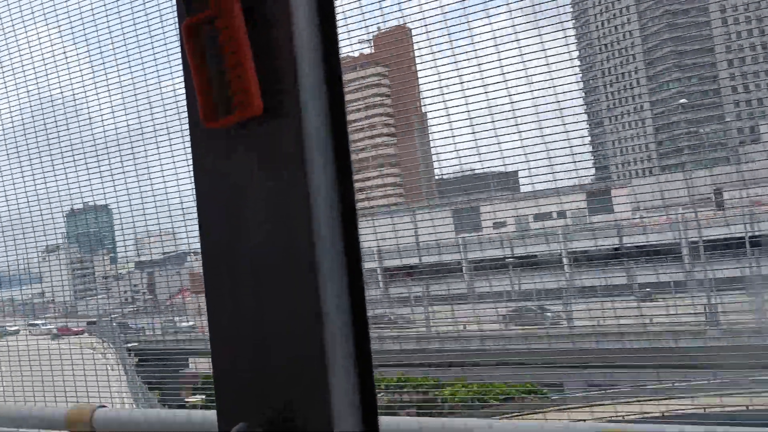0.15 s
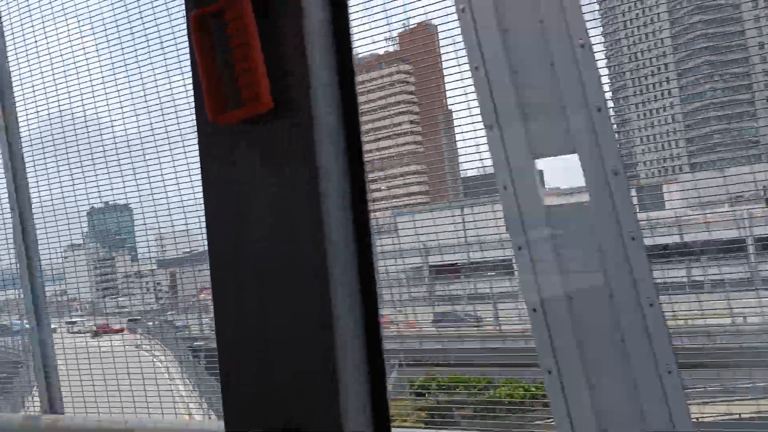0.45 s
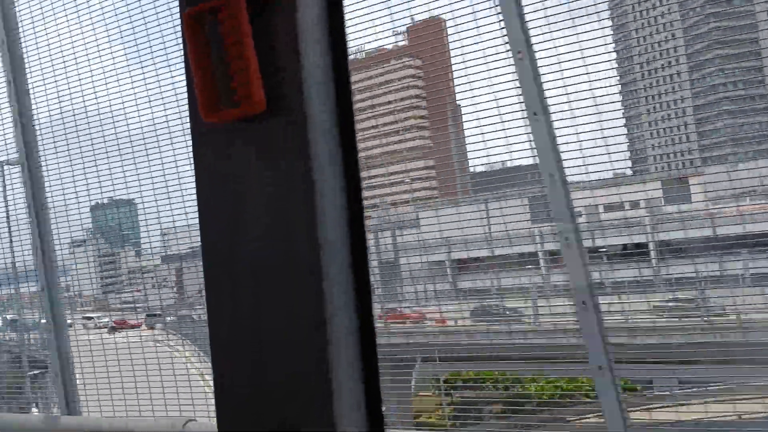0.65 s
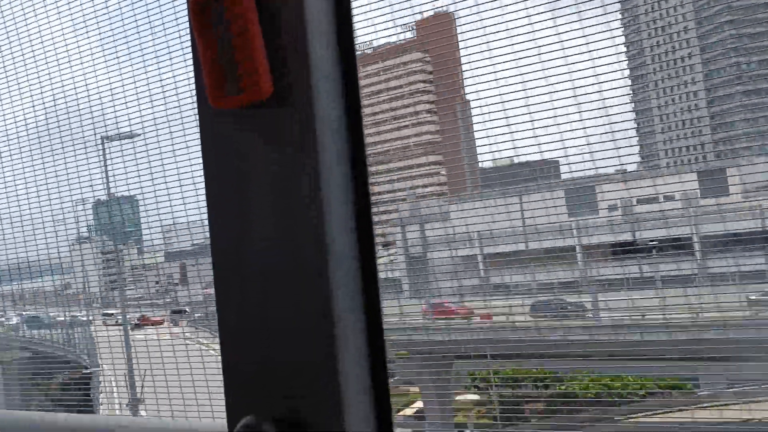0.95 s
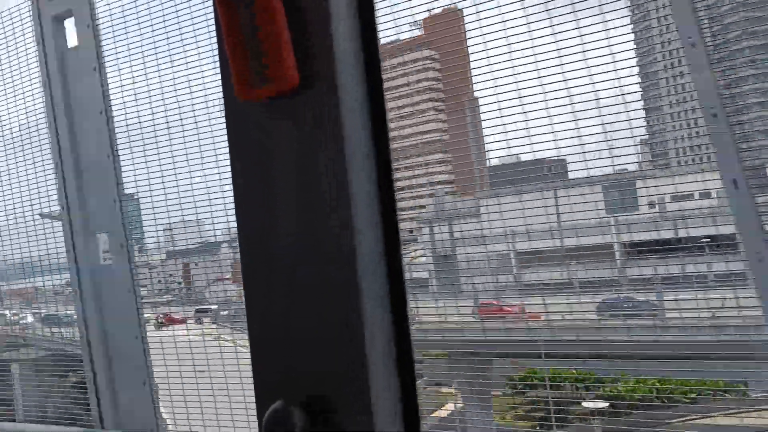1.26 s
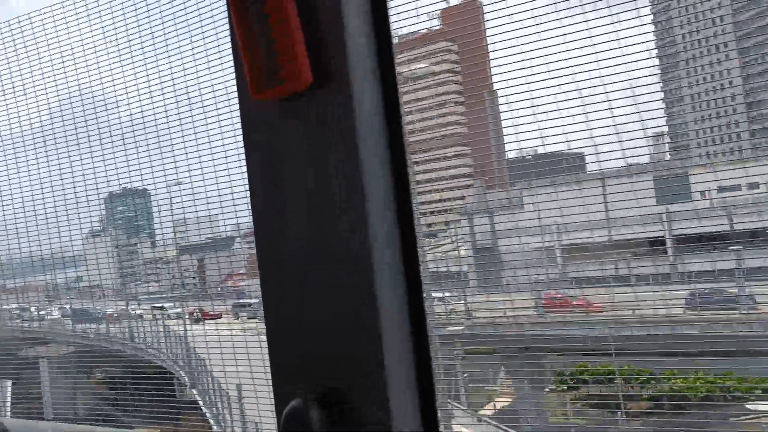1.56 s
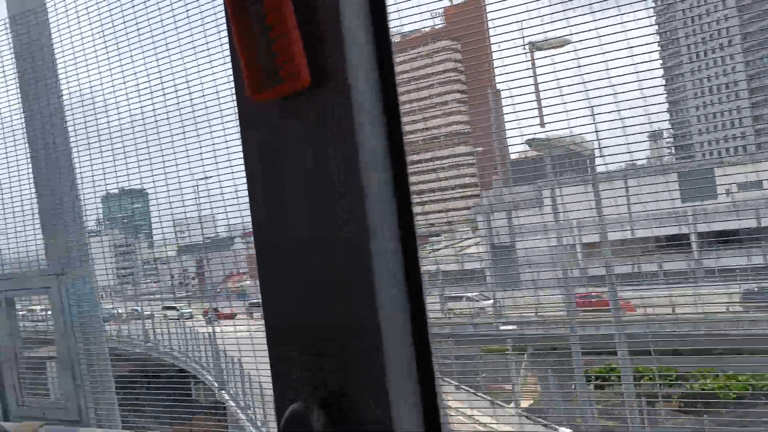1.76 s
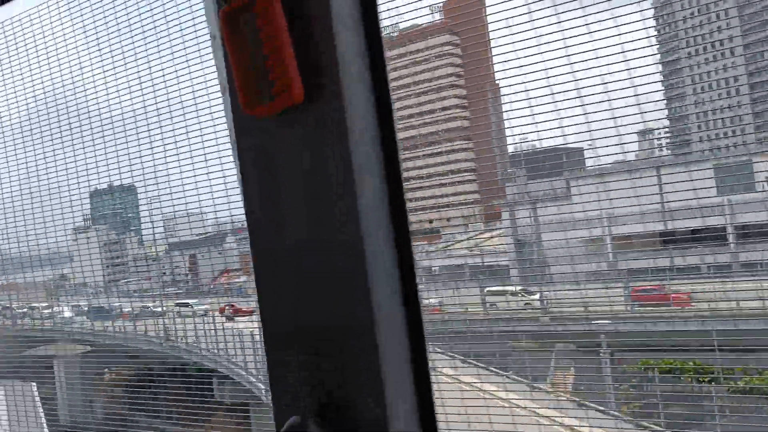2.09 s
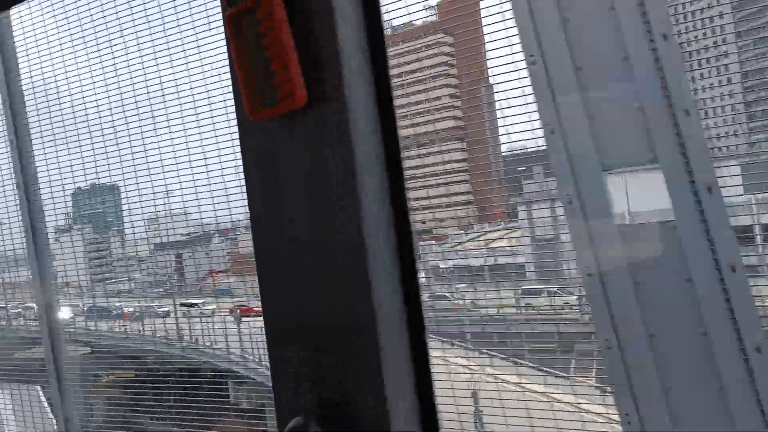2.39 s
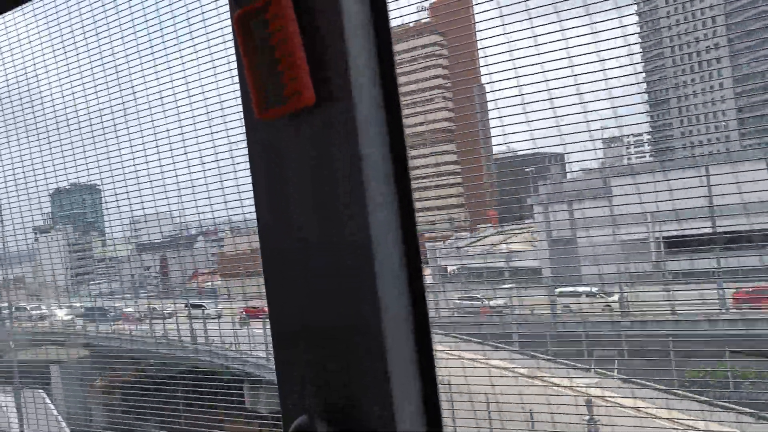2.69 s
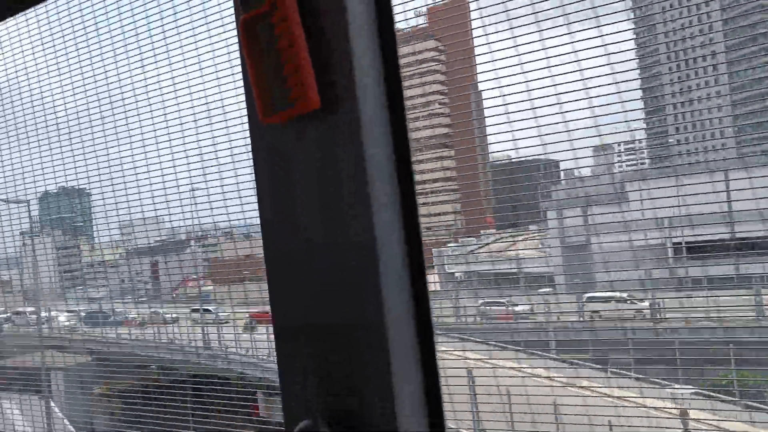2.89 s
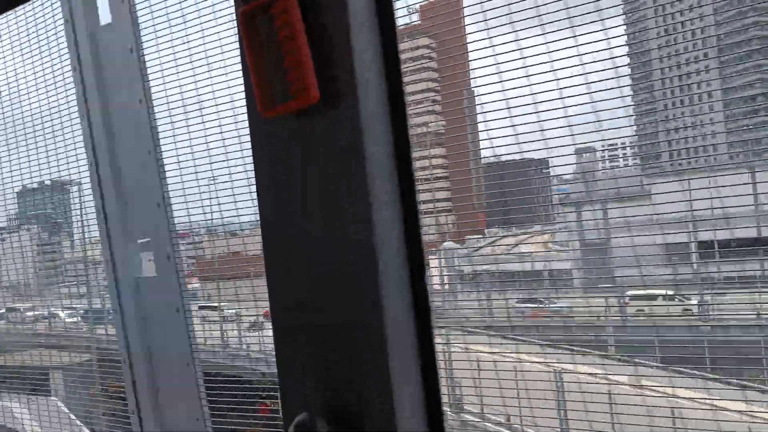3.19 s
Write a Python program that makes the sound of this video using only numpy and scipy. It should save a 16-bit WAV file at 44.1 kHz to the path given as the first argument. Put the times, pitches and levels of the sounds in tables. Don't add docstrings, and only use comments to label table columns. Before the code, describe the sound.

Diesel bus interior: low engine hum drops in pitch over tyre rumble, with light rattles and ticks

```python
import sys
import numpy as np
from scipy import signal
from scipy.fft import rfft, irfft, next_fast_len
from scipy.io import wavfile
from scipy.ndimage import uniform_filter1d, map_coordinates

SR = 44100
rng = np.random.default_rng(int(sys.argv[2]) if len(sys.argv) > 2 else 0)


def voltage_ratio(decibels):
    exponent = np.asarray(decibels, float) / 20
    return 10 ** exponent


def store_wav(level_fs):
    pcm = np.round(np.clip(np.atleast_2d(level_fs), -1, 1) * 32767)
    wavfile.write(sys.argv[1], SR, pcm.T.astype(np.int16))


N = 147294
SIDES = np.array([[1], [-1]])


def unit(x):
    return x / np.sqrt(np.mean(x ** 2) + 1e-20)


def along(points, hz):
    point_hz, value = np.transpose(points)
    return np.interp(np.log(hz + 1), np.log(point_hz + 1), value)


def curves(rows):
    s, *columns = np.transpose(rows)
    return [np.interp(np.arange(N) / SR, s, column) for column in columns]


def wobble(rate):
    knots = rng.standard_normal(400)
    return map_coordinates(knots, [np.arange(N) * rate / SR])


def filtered(x, response):
    size = next_fast_len(N + SR // 2)
    hz = np.fft.rfftfreq(size, 1 / SR)
    return irfft(rfft(x, size) * response(hz), size)[..., :N]


def modes(table):
    def response(hz):
        total = 0
        for k, (centre, width, db) in enumerate(table):
            band = 1j * hz * width
            total = total + (-1) ** k * voltage_ratio(db) * band / (centre * centre - hz * hz + band)
        return total
    return response


def peaks(table, hz):
    return voltage_ratio(sum(db / (1 + (2 * (hz - centre) / width) ** 2) for centre, width, db in table))


# pitch_hz, correlation
ALIKE = [(40, .99), (100, .97), (250, .95), (500, .75), (1200, .5), (2200, .1), (5000, .13), (15000, .1)]
# pitch_hz, left_leads_radians
LEADS = [(100, 0.5), (500, -0.74), (950, -0.96), (1250, -1.5), (2150, -5), (3000, -8.5)]
# pitch_hz, left_minus_right_db
LEAN = [(60, 1), (200, -1), (700, -0.5), (1400, -6.5), (3300, -5), (6000, -12.5), (9000, 3), (14000, -5)]


def stereo(pair):
    def mid_side(hz):
        angle = np.arccos(np.clip(along(ALIKE, hz), 0, 1)) / 2
        return np.array([np.cos(angle), np.sin(angle)])

    def placing(hz):
        return voltage_ratio(SIDES * along(LEAN, hz) / 2) * np.exp(.5j * SIDES * along(LEADS, hz))

    mid, side = filtered(pair, mid_side)
    return filtered(mid + SIDES * side, placing)


def rush(spectrum, patchy_db, ring=lambda hz: 1):
    z = signal.stft(rng.standard_normal((2, N)), nperseg=512)[2]
    patches = uniform_filter1d(rng.standard_normal(z.shape[1:]), size=6, axis=0)
    patches = unit(uniform_filter1d(patches, size=10, axis=1))
    pair = signal.istft(z * voltage_ratio(patchy_db * patches), nperseg=512)[1][:, :N]
    return unit(stereo(filtered(pair, lambda hz: voltage_ratio(along(spectrum, hz)) * ring(hz))))


# start_s, firing_hz, load_db, uneven_db (lifts the side orders between gears)
ENGINE = [(0, 96.5, -20, 0), (.1, 96.5, -16.5, -2), (.24, 96.5, -18, -1), (.33, 96, -24, 4),
          (.45, 92, -25, 7), (.6, 88, -25, 8), (.8, 79, -25, 8), (.88, 73, -22, 3), (.97, 68, -21, -1),
          (1.45, 68.2, -22, -1), (1.6, 68.8, -20, -2), (1.9, 68, -24, -1), (2.3, 68, -23.5, -3),
          (2.6, 69, -23.5, -4), (2.85, 70, -24, -2), (3, 70.5, -27, 3), (3.34, 72.5, -23.5, 2)]
# pitch_hz, level_db
CABIN = [(45, -16), (69, 0), (85, -8), (98, 0), (140, -2), (195, -3), (240, -12), (290, 0)]
ORDERS_DB = [-12, -14, -9, 0, -15, -14, -5, -5, -12, -7, -15, -12, -14, -14, -14, -6, -16, -16, -14, -16,
             -16, -12]


def engine():
    firing_hz, load_db, uneven_db = curves(ENGINE)
    cycle_hz = firing_hz * (1 + .002 * wobble(6)) / 6
    phase = 2 * np.pi * np.cumsum(cycle_hz) / SR
    out = np.zeros((2, N))
    for k, order_db in enumerate(ORDERS_DB, start=3):
        drift_db = 1 if k % 6 else .8
        start, lag = rng.standard_normal(2)
        level_db = order_db + uneven_db * (6 < k < 16) + drift_db * wobble(7)
        level_db = level_db + along(CABIN, firing_hz * k / 6)
        turn = SIDES * 0.013 * k * (lag - 1)
        out += voltage_ratio(level_db) * np.sin(k * phase + 2 * start + turn)
    return np.sqrt(2) * voltage_ratio(load_db) * out * voltage_ratio(-.5 * SIDES)


# start_s, roar_db, hiss_db
ROAD = [(0, -18.5, -35), (.45, -20.5, -34.5), (.88, -20, -36), (.95, -22, -36), (1.6, -21, -34.5),
        (1.8, -23, -37.5), (2.1, -22, -38), (2.45, -24, -36), (2.9, -19.5, -35), (3.34, -18.5, -34)]
# pitch_hz, level_db (per Hz)
ROAR = [(13, -61), (22, -9.5), (64, -7), (100, -3), (193, -11.5), (233, -9.5), (299, -9.5), (441, -9.5),
        (900, -25), (1170, -31), (1980, -120)]
HISS = [(410, -31), (700, 3), (985, -4.5), (1140, -1.5), (1470, -5.5), (1820, -5.5), (3270, -18.5),
        (6100, -29), (7200, -32), (9360, -61.5), (15800, -120)]
AIR = [(5000, -32), (7200, -24), (8200, -9.5), (9500, -15.5), (12400, -13.5), (13200, -13), (15900, -10),
       (16500, -10.5)]
# pitch_hz, width_hz, level_db
PANELS = [(121, 210, 5), (190.8, 87, 2), (302.6, 20, 6), (376, 9.5, 5.5), (519, 51, 5), (633.5, 66, 7.5),
          (850, 49, 7.5), (917.4, 25, 13.5)]


def road():
    roar_db, hiss_db = curves(ROAD)
    roar_noise = rush(ROAR, patchy_db=.3, ring=lambda hz: peaks(PANELS, hz))
    roar = voltage_ratio(roar_db - 2 + 0.31 * wobble(7.4)) * roar_noise

    shake_db = 0.51 * wobble(8.5) + 0.82 * wobble(36)
    clatter_db = 0.06 * np.sin(np.pi * np.cumsum(curves(ENGINE)[0]) / SR)
    port = [(6490, 1200, 5.5)]
    hiss_noise = rush(HISS, patchy_db=.3, ring=lambda hz: peaks(port, hz))
    hiss = voltage_ratio(hiss_db + 1 + shake_db + clatter_db) * hiss_noise

    air_db = -63 + .6 * (hiss_db - hiss_db.mean()) + 1.3 * shake_db
    return roar + hiss + voltage_ratio(air_db) * rush(AIR, patchy_db=1.2)


WHINE_HZ = [1108, 1618, 1782, 1576]
# width_hz, left_minus_right_db, left_leads_radians, makeup_db
WHINES = [(16, -7, -2.5, 8), (6, -7, -2.6, 6), (14, -6, 1.2, 3), (12, -6, -2.5, 6)]
# start_s, level_db, level_db, level_db, level_db
GEARS = [(0, -48, -58, -54, -64), (.08, -43, -57, -52, -62), (.28, -43, -54, -52, -56),
         (.36, -54, -54, -58, -53), (.5, -58, -56, -54, -62), (.58, -56, -56, -45, -64),
         (.65, -54, -55, -55, -64), (.9, -60, -54, -56, -64), (1.2, -60, -55, -60, -64),
         (1.5, -60, -56, -56, -64), (2, -62, -57, -62, -64), (2.6, -58, -56, -60, -60),
         (2.85, -55, -55, -55, -59), (3.02, -55, -55, -51, -59), (3.1, -56, -54, -57, -58),
         (3.22, -56, -54, -51, -60), (3.34, -56, -58, -52, -62)]


def gear_whines():
    t, half = np.arange(N) / SR, SIDES / 2
    out = np.zeros((2, N))
    for hz, mesh_db, (width, lean_db, lead, makeup_db) in zip(WHINE_HZ, curves(GEARS), WHINES):
        level_db = mesh_db + makeup_db + 1.2 * wobble(width) + half * lean_db
        out += voltage_ratio(level_db) * np.sin(2 * np.pi * hz * t + .7 * wobble(width) + half * lead)
    return np.sqrt(2) * out


# start_s, pitch_hz, level_db
TURBO = [(0, 13130, -86), (.4, 13200, -83), (.75, 12950, -83), (1.0, 12550, -87), (1.2, 12250, -81),
         (1.7, 11520, -83), (2.05, 11100, -79), (2.4, 10975, -78), (3.1, 10975, -77), (3.34, 11030, -84)]


def turbo():
    turbo_hz, turbo_db = curves(TURBO)
    spin = 2 * np.pi * np.cumsum(turbo_hz + 18 * wobble(40)) / SR
    flicker_db = 6 * np.array([wobble(30), wobble(30)])
    level_db = turbo_db + flicker_db + 2.5 * SIDES
    return np.sqrt(2) * voltage_ratio(level_db) * np.sin(spin - .6 * SIDES)


# pitch_hz, width_hz, level_db, left_minus_right_db
HUMS = [(295, 20, -32, -2.5), (194, 12, -27, -1.5), (432, 12, -39, 0), (532, 20, -38, 1),
        (630, 24, -39, -2)]
# start_s, level_db
SHAKE = [(0, 0), (.3, 0), (.45, 3), (.6, 1), (.88, 1), (.97, -5), (1.4, -5), (1.7, -5), (2, -8), (2.6, -8),
         (3, -5), (3.34, -4)]


def hums():
    t, half = np.arange(N) / SR, SIDES / 2
    out = np.zeros((2, N))
    for hz, width, db, lean_db in HUMS:
        level_db = db + 2.3 * wobble(width) + half * lean_db
        out += voltage_ratio(level_db) * np.sin(2 * np.pi * hz * t + 1.38 * wobble(width) - half * hz / 900)
    return np.sqrt(2) * voltage_ratio(curves(SHAKE)[0]) * out


def burst(s, db, length, lean_db):
    rise_s, fade_s = .007, .012
    t = np.arange(N) / SR - s
    fade = np.exp(-np.maximum(t - length / 2, 0) / fade_s * 0.016 / length)
    return voltage_ratio(db + SIDES * lean_db / 2) * np.clip(t / rise_s, 0, 1) * fade


def knocks():
    per_s = 6000
    hits = rng.random((2, N)) < per_s / SR
    return stereo(unit(hits * rng.standard_normal((2, N))))


# start_s, level_db, length_s, left_minus_right_db
TRIM = [
    (0.344, -43.5, 0.019, -6),
    (0.607, -50.5, 0.036, -2),
    (0.756, -43.5, 0.026, -2),
    (0.94, -44, 0.029, -1),
    (1.145, -52, 0.03, 2),
    (1.393, -55, 0.041, -11),
    (2.025, -54, 0.054, -5),
]
# pitch_hz, width_hz, level_db
TRIM_MODES = [(2800, 900, -5), (4250, 250, 3), (5300, 200, 7)]


def trim_creaks():
    ring = modes(TRIM_MODES)
    grit = sum(burst(*row) for row in TRIM) * knocks()
    creak = filtered(grit, lambda hz: ring(hz) / (1 + (hz / 7000) ** 6))
    return voltage_ratio(9) * creak * voltage_ratio(2 * SIDES)


# start_s, level_db, pitch_hz, length_s
THUMPS = [
    (.59, -17, 132, .14),
    (1.669, -20, 42, .11),
    (2.06, -13, 68, .07),
    (.632, -26, 520, .006),
    (3.203, -26, 560, .006),
    (2.447, -41, 2330, .022),
    (2.44, -43, 1950, .016),
]


def thumps():
    t = np.arange(N) / SR
    out = np.zeros(N)
    for s, db, hz, length in THUMPS:
        swell = np.exp(-((t - s) / length) ** 2 * 4)
        out += voltage_ratio(db) * swell * np.sin(2 * np.pi * hz * (t - s))
    return out


# start_s, level_db, length_s, brightness_db, left_minus_right_db
FRAME = [(0.751, -64, 0.035, 2.5, 5.5), (0.771, -55, 0.033, 5.5, -3), (0.823, -60, 0.026, -2.5, -5),
         (1.281, -62, 0.018, -4.5, 2), (1.655, -59, 0.04, -10.5, -2), (1.912, -53, 0.051, -10.5, -5),
         (1.992, -59, 0.1, -4, -2), (2.129, -60, 0.028, -1.5, -0.5), (2.152, -54, 0.05, -15, -5),
         (2.345, -63, 0.045, 3.5, -7), (2.433, -45.5, 0.034, -3, -3), (2.581, -55, 0.021, -9.5, -9),
         (2.589, -61, 0.044, 5.5, -6.5), (2.981, -61.5, 0.039, -4.5, -12.5), (3.088, -47, 0.022, -10, -4),
         (3.273, -64.5, 0.019, -5.5, 2)]
# pitch_hz, width_hz, level_db
FRAME_MODES = [(1940, 550, -0.5), (2307, 355, 11), (2350, 2400, 0), (3800, 690, 4.5), (6650, 450, 3.5),
               (8440, 800, -16), (11000, 3500, -16.5), (14500, 3000, -13.5)]


def frame_rattles():
    ring, grit = modes(FRAME_MODES), knocks()
    dull = sum(burst(s, db, length, lean_db) for s, db, length, bright_db, lean_db in FRAME)
    sharp = sum(burst(s, db + bright_db, length, lean_db) for s, db, length, bright_db, lean_db in FRAME)
    below = lambda hz: 1 / (1 + (hz / 9000) ** 8)
    frame = filtered(dull * grit, lambda hz: ring(hz) * below(hz))
    frame = frame + filtered(sharp * grit, lambda hz: ring(hz) * (1 - below(hz)))
    return voltage_ratio(14.5) * frame * voltage_ratio(2 * SIDES)


# start_s, level_db, left_minus_right_db
TICKS = [
    (.752, -57, 0.5),
    (.778, -44.5, -6.5),
    (0.822, -53, -4.5),
    (2.001, -54.5, -1),
    (2.434, -52, -5.5),
    (2.447, -53.5, -2),
    (3.094, -49.5, -6.5),
]


def ticks():
    decay_s, bright_hz = .0012, 4000
    t = np.arange(N) / SR
    shape = np.zeros((2, N))
    for s, db, lean_db in TICKS:
        shape += voltage_ratio(db + SIDES * lean_db / 2) * (t > s) * np.exp(-np.abs(t - s) / decay_s)
    return filtered(shape * rng.standard_normal((2, N)), lambda hz: 1j * hz / (bright_hz + 1j * hz))


def scene():
    steady = engine() + road() + gear_whines() + turbo() + hums()
    return steady + trim_creaks() + thumps() + frame_rattles() + ticks()


def roll_off(x):
    return signal.sosfilt(signal.butter(12, 16020, fs=SR, output="sos"), x)


def record(dry):
    mix = filtered(dry, lambda hz: hz < 15830)
    return roll_off(mix)


dry = scene()
out = record(dry)
store_wav(out)
```